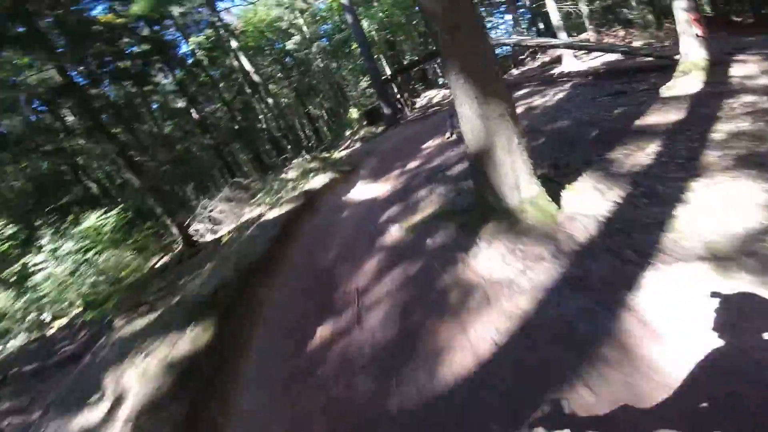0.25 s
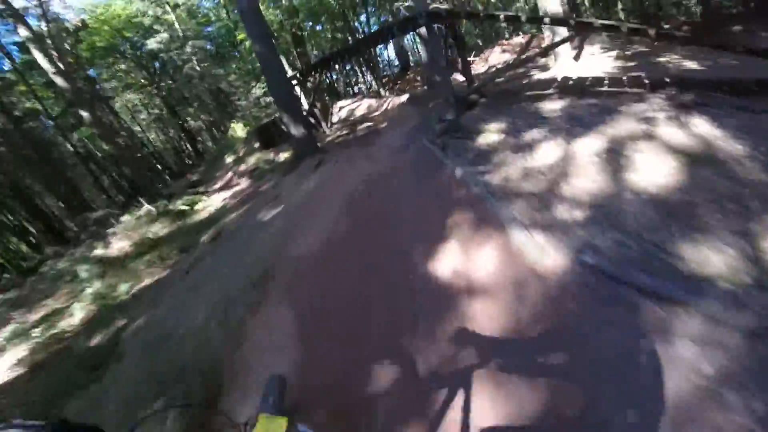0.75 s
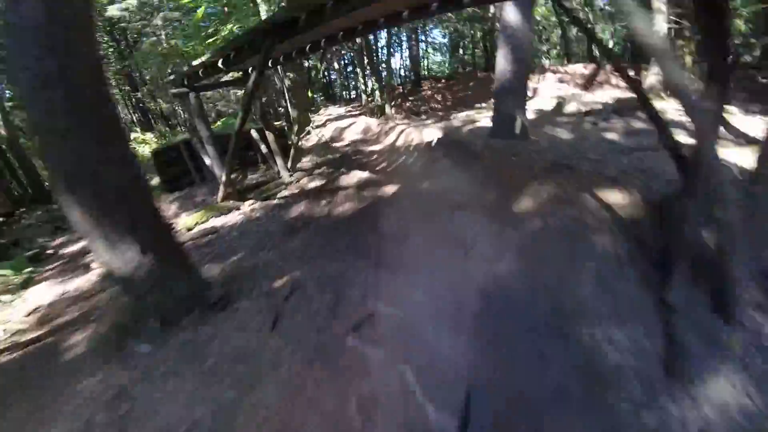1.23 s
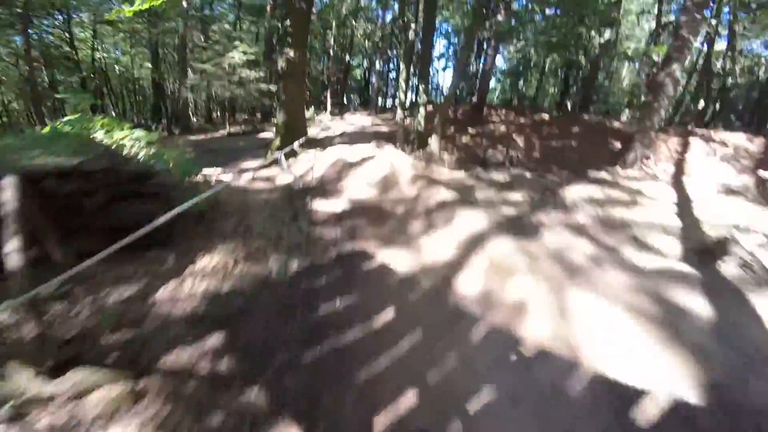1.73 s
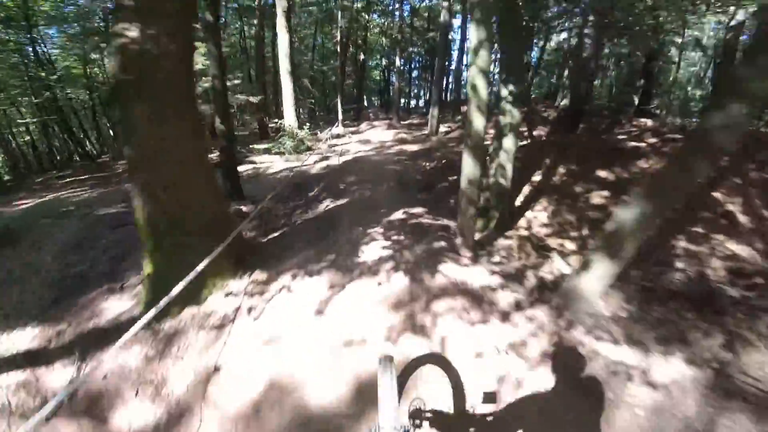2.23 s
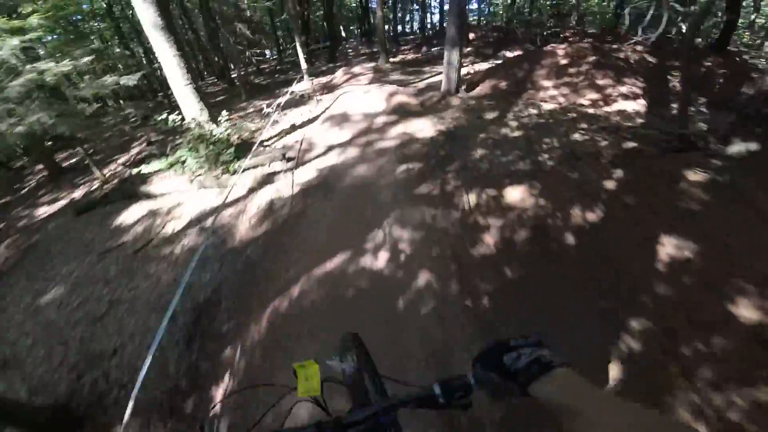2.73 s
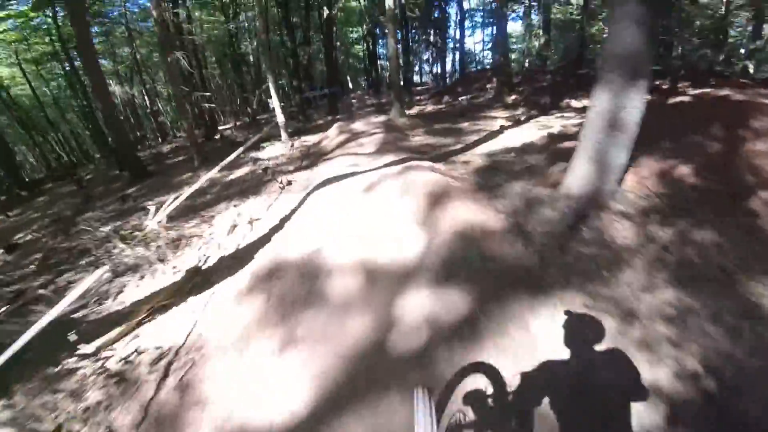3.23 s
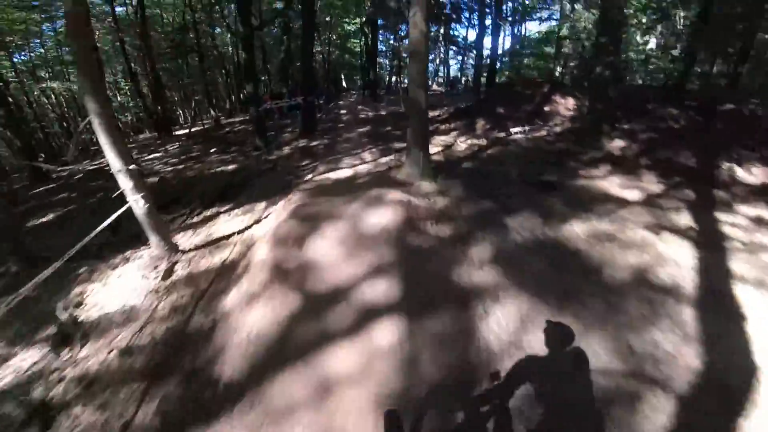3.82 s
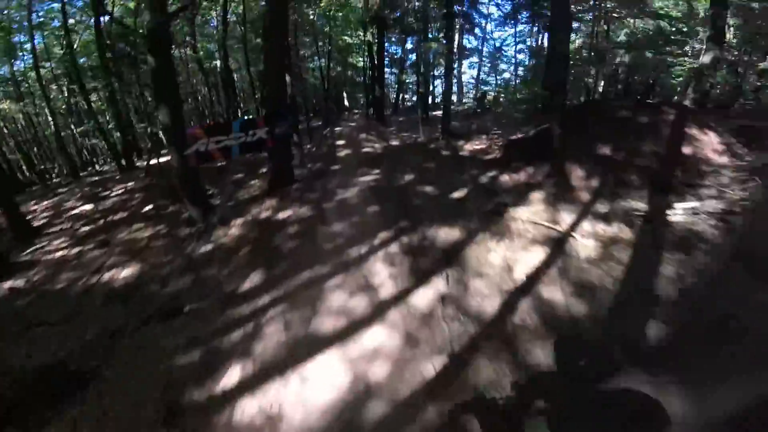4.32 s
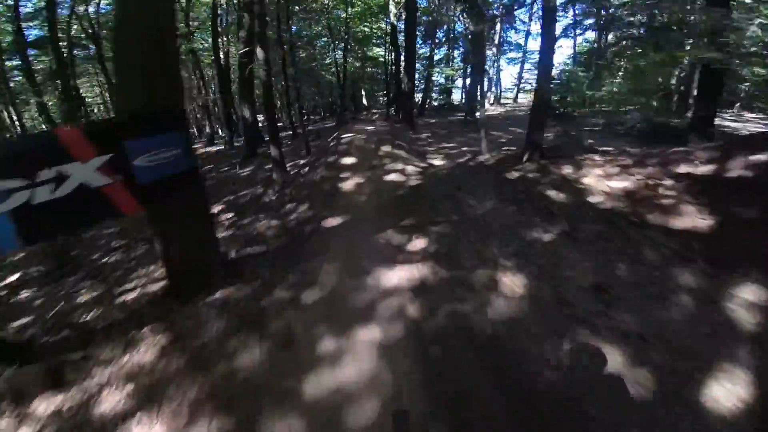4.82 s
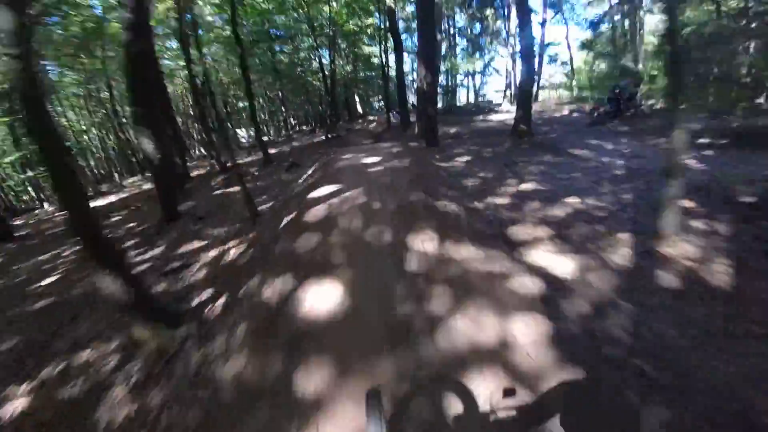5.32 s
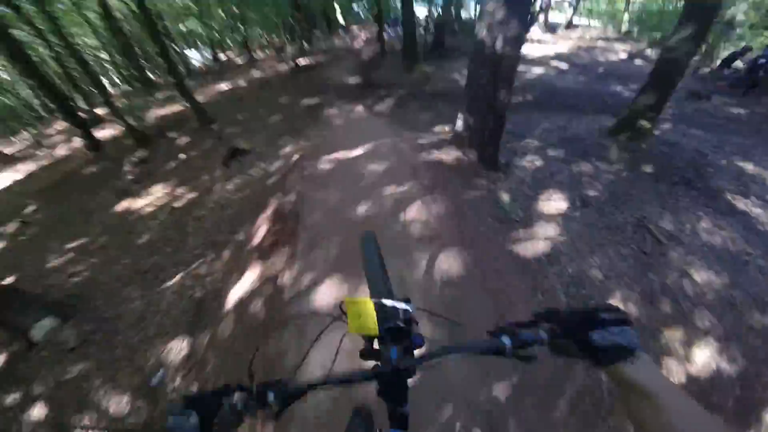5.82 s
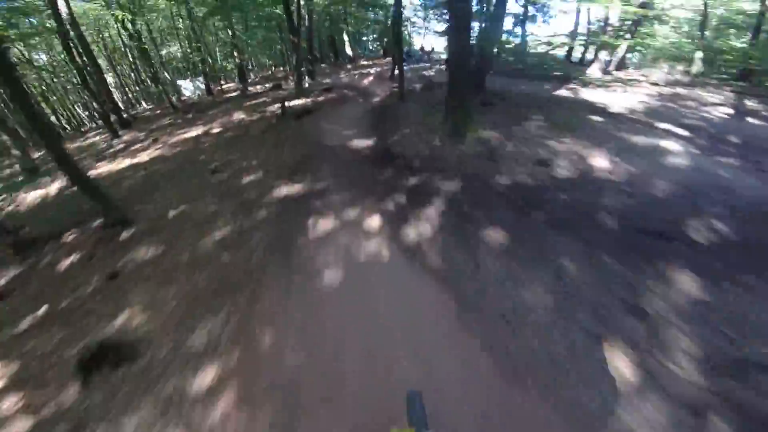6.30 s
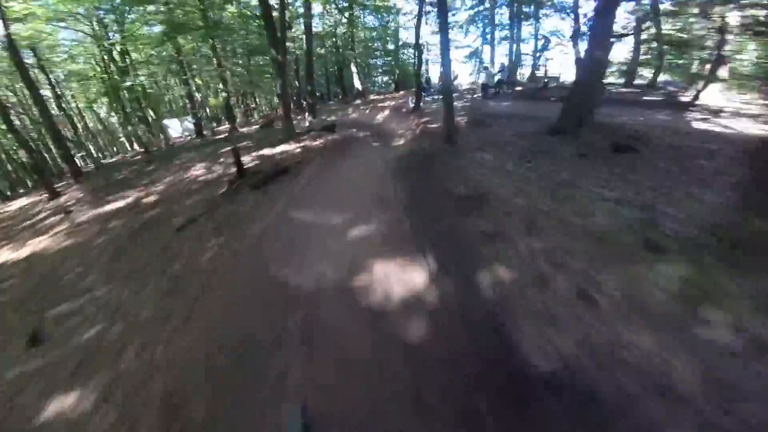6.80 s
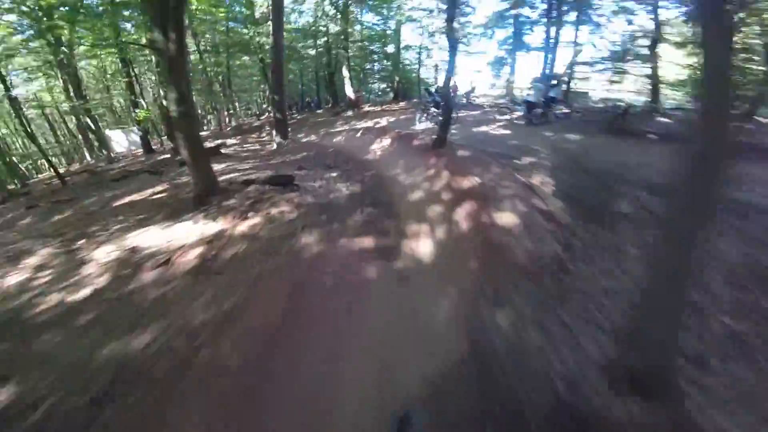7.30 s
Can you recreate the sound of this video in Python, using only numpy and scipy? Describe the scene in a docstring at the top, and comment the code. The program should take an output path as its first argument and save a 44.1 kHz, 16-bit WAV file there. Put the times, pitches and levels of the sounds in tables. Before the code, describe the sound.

A mountain bike rumbles and rattles over a dirt forest trail, with wind buffeting the microphone and a few heavy thumps.

```python
"""A mountain bike on a dry forest trail, heard close up from a camera worn by the rider.
From the start, wind buffets the microphone port and the tyres rumble and crunch over dirt. Near 1 s
the wheels hit roots, chain and cables rattle, and the camera turns its gain down for a moment.
Near 3 s the freehub's buzz swells as the rider coasts, just before another heavy landing.
A gust hoots at 5.5 s, two more heavy thumps follow, and the bike rolls on into the wind."""
import sys
import numpy as np
from scipy import signal
from scipy.fft import rfft, irfft, next_fast_len
from scipy.io import wavfile
from scipy.ndimage import uniform_filter1d, minimum_filter1d, map_coordinates

SR = 44100
rng = np.random.default_rng(int(sys.argv[2]) if len(sys.argv) > 2 else 0)


def waveform_to_disk(signal):
    """Save audio, clipped to [-1, 1], as 16-bit WAV at the path in sys.argv[1]."""
    frames = np.transpose(np.atleast_2d(signal))
    scaled = np.clip(frames, -1, 1) * 32767
    samples = np.round(scaled).astype(np.int16)
    wavfile.write(sys.argv[1], SR, samples)


N = 332955

# The rotor brushes its pads. Each row: peak in seconds, level in dB, half-width in seconds.
ROTOR_BRUSHES = [(.708, -49, 0.024), (1.42, -54.5, 0.043), (4.25, -54, 0.058), (5.708, -51, 0.025)]
# The freehub follows the wheel's speed. Each row: time in seconds, ticks per second.
PAWL_RATES = [(3.0, 89), (5.1, 101), (6.25, 78)]
# The wheel spins freely. Each row: peak in seconds, freehub level in dB, half-width in seconds.
FREE_SPINS = [(2.8, -63, 0.31), (6.03, -76, 0.34)]
# A link or spoke rings. Each row: start in seconds, level in dB, pitch in Hz.
METAL_PINGS = [(1.516, -43, 6220), (5.734, -39, 4940), (5.774, -47, 8250)]
# Bumps shake chain and cables. Each row: start in seconds, level in dB.
CHAIN_RATTLES = [(0.2746, -41.5), (0.4115, -42.5), (0.8945, -31.5), (1.055, -42), (1.4041, -47),
                 (1.5425, -38.5), (1.563, -49.5), (1.643, -39), (1.688, -47), (2.4807, -49), (3.084, -33.5),
                 (3.1258, -38), (4.067, -46.5), (4.2266, -42), (4.3615, -38), (5.409, -43), (5.4247, -44),
                 (5.456, -47), (5.5857, -40), (5.7335, -41.5), (5.7708, -43.5), (5.8335, -42.5),
                 (6.8606, -47)]
# Stones under the tyres. Each row: start in seconds, level in dB.
STONE_KNOCKS = [(1.492, -35), (1.842, -30), (3.759, -29.5), (4.375, -36.5), (6.969, -36)]
# Gravel gives way. Each row: peak in seconds, level in dB, fall in seconds.
GRAVEL_CRUNCHES = [(1.577, -42.5, 0.028), (1.64, -41.5, 0.03), (2.27, -42, 0.046), (3.231, -41, 0.018),
                   (3.542, -46.5, 0.04), (4.016, -46, 0.02), (4.05, -50, 0.02), (4.14, -45.5, 0.031),
                   (5.597, -38, 0.013), (6.653, -45, 0.052)]
# The wheels strike roots and hollows.
# Each row: start in seconds, strength in dB, pitch in Hz, seconds to decay by 60 dB.
WHEEL_BLOWS = [(0.931, 6, 36.6, 0.11), (1.385, -33.5, 279, 0.27), (1.562, 3, 72, 0.018),
               (2.503, -19.5, 111, 0.031), (3.076, 9, 29.6, 0.16), (3.755, -21, 137, 0.095),
               (5.685, 11.5, 57, 0.017), (6.197, -21.5, 213, 0.053), (6.41, 7, 24.9, 0.095)]

# Swells of ground and air. Each row: peak in seconds, level in dB, half-width in seconds.
DIRT_SPRAYS = [(.25, -57, 0.6), (.74, -55.5, 0.16), (1.6, -53, 0.15), (2.45, -56, 0.14), (5.45, -65, 0.64)]  # the tyres run through loose dirt
RUMBLE_SURGES = [(.06, -31.5, 0.99), (.91, -30, 0.026), (2.53, -26.5, 0.05), (2.605, -27.5, 0.025),
                 (2.69, -36, 0.022), (2.885, -33.5, 0.068), (4.27, -38, 0.11), (5.232, -25, 0.11),
                 (5.96, -36.5, 0.07)]  # the low rumble grows
PORT_SHOVES = [(.1, -27, 0.29), (.68, -16.5, 0.024), (.81, -17.5, 0.048), (1.44, -23, 0.028),
               (1.6, -16, 0.075), (1.8, -20.5, 0.046), (2.37, -31, 0.077), (3.92, -24, 0.04),
               (4.02, -23, 0.036), (4.71, -24.5, 0.05), (5.12, -33, 0.2), (5.48, -22.5, 0.066),
               (5.65, -23.5, 0.18), (6.79, -25, 0.047), (7.02, -30, 0.03), (7.2, -17.5, 0.03)]  # big, slow eddies push at the microphone
# Brief drops in level. Each row: centre in seconds, depth in dB, half-width in seconds.
CREST_LIFTS = [(3.86, 2, 0.035), (5.93, 3, 0.1)]  # the bike goes light over a crest and the hiss falls away
RUMBLE_HUSHES = [(2.41, 27, 0.075), (2.65, 14, .025), (3.85, 6, 0.41), (5.858, 10, 0.054), (6.61, 7, 0.071)]  # the rumble drops away
BUFFET_CALMS = [(1.24, 8, 0.18), (2.645, 9, 0.015), (2.79, 6, 0.07), (4.48, 5, 0.093), (4.89, 5, 0.05),
                (6.05, 7.5, 0.25), (6.61, 2.5, 0.033), (7.35, 6.5, 0.086)]  # the buffeting dies down

# Strong gusts make an edge hoot. Each row: peak in seconds, level in dB, half-width in seconds,
# pitch in Hz, glide in Hz per second, pitch unrest in Hz.
EDGE_TONES = [(0.64, -42.5, 0.14, 600, 302, 118), (2.314, -43, .036, 538, -3200, 54),
              (2.432, -46, 0.056, 463, -0.5, 25), (5.526, -47, 0.12, 470.4, 1.5, 40.4)]
# Eddies tear across the port. Each row: peak in seconds, level in dB, fall in seconds.
PORT_EDDIES = [(0.648, -31, 0.013), (0.727, -32.5, 0.021), (0.838, -42, 0.012), (1.372, -43, 0.022),
               (1.489, -41.5, 0.023), (2.996, -50, 0.021), (3.031, -33, 0.015), (3.94, -44, 0.011),
               (6.319, -44, 0.038)]
# Suction at the port snaps back. Each row: time in seconds, step in dB before filtering.
SUCTION_POPS = [(3.041, -8), (5.601, -19), (6.339, -23.5), (6.369, -15)]
# Air rushes past the camera. Each row: peak in seconds, level in dB, rise and fall in seconds.
AIR_GUSTS = [(0.04, -40.5, 0.4, 0.084), (0.629, -42, 0.63, 0.18), (1.0, -48.5, 0.27, 0.2),
             (1.67, -44.5, 0.47, 0.3), (2.36, -43, 0.42, 0.16), (3.26, -44.5, 0.3, 0.53),
             (4.14, -44.5, 0.22, 0.18), (4.81, -41, 0.35, 0.28), (5.57, -39.5, 0.54, 0.15),
             (6.015, -55, .009, 0.22), (6.68, -46, 0.29, 0.91), (7.11, -51, 0.083, 0.15),
             (7.54, -46, 0.084, 0.033)]

# Each source's tone at the microphone. Each row: frequency in Hz, relative level in dB.
PAWL_SPECTRUM = [(800, -20), (2200, -10), (2780, 10.5), (4200, -10), (5200, 5), (9400, -3), (10300, -10)]
STONE_SPECTRUM = [(100, -3), (300, 12), (600, 4.5), (900, -18), (1500, -23)]
GRIT_SPECTRUM = [(500, -3.5), (3000, 0.5), (4200, -4.5), (5000, 2.5), (9300, -6.5), (10900, -25.5),
                 (13500, -24)]
RUMBLE_SPECTRUM = [(35, -14.5), (70, 2), (115, 3.5), (160, -4), (450, -31.5)]
RUSH_SPECTRUM = [(90, -18.5), (260, 7.5), (440, 3), (640, 1.5), (720, -3.5), (880, -0.5), (1500, -5.5),
                 (2100, -8.5), (2900, -17.5), (4500, -26.5)]
BUFFET_SPECTRUM = [(8, -19), (18, 2), (28, 2), (45, -11.5), (130, -35.5)]
# The camera case colours the sound. Each row: centre in Hz, width in Hz, boost or cut in dB.
CASE_RESONANCES = [(459, 31, 3.5), (5320, 1150, 5), (6080, 385, -6.5), (6516, 670, 8.5), (6350, 160, 3)]

FREEHUB_DB, GRIT_DB, ROLL_DB, LULL_DB, BUFFET_DB = -67, -62, -38.5, -58, -26.5  # between swells
JOSTLE_DB, JOSTLES_PER_S = -61, 3.7  # faint, random rattles
REBOUND_S, REBOUND_LOSS_DB = 0.008, 7.5  # mean gap between a rattle's contacts, loss at each
CEILING_DB, REACT_S, RECOVER_DB_PER_S = -8.5, 0.0064, 11  # the camera's gain control
BAND_LIMIT_HZ = 13900


def amp(db):
    """Decibels to gain."""
    return 10 ** (np.asarray(db) / 20)


def unit(x):
    """Scale to rms 1."""
    return x / np.sqrt(np.mean(x ** 2) + 1e-20)


def add(track, s, sound):
    """Mix a sound in at s seconds."""
    part = track[max(round(s * SR), 0):][:len(sound)]
    part += sound[:len(part)]


def wobble(rate):
    """A smooth random curve, rate knots a second."""
    knots = rng.standard_normal(int(N * rate / SR) + 4)
    return map_coordinates(knots, [np.arange(N) * rate / SR])


def swell(s, db, rise, fall):
    """A smooth bump peaking at s, 17 dB down at rise seconds before and fall seconds after."""
    t = np.arange(N) / SR - s
    return amp(db) * np.exp(-2 * (t / np.where(t < 0, rise, fall)) ** 2)


def swells(rows):
    """An envelope of even-sided bumps."""
    return sum(swell(s, db, width, width) for s, db, width in rows)


def dips(rows):
    """A gain of 1 with smooth hollows."""
    return amp(-sum(depth_db * swell(s, 0, width, width) for s, depth_db, width in rows))


def bursts(rows, t60, attack):
    """An envelope that jumps at each row's start and dies away."""
    envelope, t = np.zeros(N), np.arange(SR // 4) / SR
    for s, db in rows:
        add(envelope, s, amp(db - 60 * t / t60) * (1 - np.exp(-t / attack)))
    return envelope


def shaped(x, gain_db):
    """Causal filter whose gain in dB is a function of frequency."""
    size = 2 * next_fast_len(N // 2 + SR // 4)
    cepstrum = irfft(np.log(amp(gain_db(np.fft.rfftfreq(size, 1 / SR)))))
    cepstrum[1:size // 2] *= 2  # fold to minimum phase
    cepstrum[size // 2 + 1:] = 0
    return irfft(rfft(x, size) * np.exp(rfft(cepstrum)))[:N]


def colour(x, points):
    """Filter x through (Hz, dB) points, falling steeply past the last one."""
    freqs, db = np.transpose(points)

    def gain_db(hz):
        rolloff_db = 70 * np.log10(np.maximum(hz / freqs[-1], 1))
        return np.interp(np.log(hz + 1), np.log(freqs), db) - rolloff_db
    return shaped(x, gain_db)


def noise(points):
    """Coloured noise of rms 1."""
    return unit(colour(rng.standard_normal(N), points))


def grains(rate, spread_db):
    """Random impulses of uneven size, about rate a second, rms 1."""
    impulses = (rng.random(N) < rate / SR) * rng.standard_normal(N)
    return unit(impulses * amp(spread_db * rng.standard_normal(N)))


def steady(x, span):
    """Even out the swells of x that are slower than span seconds."""
    size = max(int(span * SR), 2)
    power = np.abs(signal.hilbert(x)) ** 2
    slow_power = uniform_filter1d(uniform_filter1d(power, size), size)
    return unit(x / np.sqrt(np.abs(slow_power) + 1e-9))


def patchy(x, depth_db):
    """Let neighbouring pitches swell and fade in short, random patches."""
    spectra = signal.stft(x, nperseg=256)[2]
    patches = rng.standard_normal(spectra.shape)
    for _ in range(2):
        patches = uniform_filter1d(uniform_filter1d(patches, size=4, axis=0), size=7, axis=1)
    return unit(signal.istft(spectra * amp(depth_db * unit(patches)))[1][:N])


def cusped(x, sharpness):
    """Flatten the crests of x and sharpen its troughs, like the suction in an eddy's core."""
    analytic = signal.hilbert(x)
    return unit(np.real(analytic / (1 + sharpness * np.exp(1j * np.angle(analytic)))))


def freehub():
    """Faint, from the rear wheel: pawls drop over ratchet teeth, faster as it spins faster."""
    rate = np.interp(np.arange(N) / SR, *np.transpose(PAWL_RATES))
    teeth_passed = np.floor(np.cumsum(rate) / SR)
    clicks = np.diff(teeth_passed, prepend=0) * amp(1.9 * rng.standard_normal(N))
    decays = signal.lfilter([1], [1, -np.exp(-1 / (0.0065 * SR))], clicks)
    buzz = unit(colour(decays * rng.standard_normal(N), PAWL_SPECTRUM))
    return (amp(FREEHUB_DB) + swells(FREE_SPINS)) * buzz


def brakes():
    """Down at the hub, the steel rotor scrapes thinly on its pads."""
    return swells(ROTOR_BRUSHES) * noise([(3000, -18.5), (5100, 1.0), (7000, -14.0)])


def pings():
    """Now and then a single link or spoke rings at its own, slightly unsteady pitch."""
    track, t = np.zeros(N), np.arange(SR // 10) / SR
    for s, db, hz in METAL_PINGS:
        phase_drift = 0.054 * np.cumsum(rng.standard_normal(len(t)))
        add(track, s, amp(db - 60 * t / 0.023) * np.sin(2 * np.pi * hz * t + phase_drift))
    return track


def rattles():
    """Below the rider, chain and cables strike with a dry tick and three uneven rebounds."""
    contacts = rng.standard_normal(N) + 0.5 * grains(rate=1500, spread_db=2)
    metal = [(400, 12.5), (2000, 7.5), (3800, 8.0), (6500, 10.5), (8500, 4.5),
             (10500, -7.5), (13500, -46)]
    jostles = [(i / SR, JOSTLE_DB) for i in np.flatnonzero(rng.random(N) < JOSTLES_PER_S / SR)]
    ticks = []
    for s, db in list(CHAIN_RATTLES) + jostles:
        lags = np.cumsum(REBOUND_S * (0.5 + rng.random(3)))
        ticks += [(s + lag, db - REBOUND_LOSS_DB * k) for k, lag in enumerate([0, *lags])]
    return bursts(ticks, t60=0.034, attack=0.0006) * patchy(colour(contacts, metal), depth_db=2.5)


def crunches():
    """Loose gravel gives way under a tyre: a sudden cluster of dull little cracks."""
    cracks = colour(grains(rate=1400, spread_db=3.0), [(300, 2.0), (1700, 3.0), (3000, -7)])
    envelope = sum(swell(s, db, rise=0.011, fall=fall) for s, db, fall in GRAVEL_CRUNCHES)
    return envelope * steady(cracks, span=0.012)


def knocks():
    """Rubber softens each stone to a short, hollow knock."""
    return bursts(STONE_KNOCKS, t60=0.037, attack=0.0015) * steady(noise(STONE_SPECTRUM), span=0.0032)


def hoots():
    """Air over an edge near the microphone makes rough, hollow tones that swell, slide and fade."""
    track, t = np.zeros(N), np.arange(N) / SR
    for s, db, width, hz, glide, unrest in EDGE_TONES:
        pitch = hz + glide * (t - s) + unrest * wobble(230)
        tone = np.sin(2 * np.pi * np.cumsum(pitch) / SR)
        track += swell(s, db, width, width) * unit(tone * amp(2.7 * wobble(90)))
    return track


def eddies():
    """Turbulence right at the port: abrupt rasps, and pops as suction builds and snaps back."""
    envelope = sum(swell(s, db, rise=0.0012, fall=fall) for s, db, fall in PORT_EDDIES)
    rasps = envelope * noise([(150, 11.5), (1300, 16.5), (2600, 10), (4200, -13.0)])
    suction, t = np.zeros(N), np.arange(SR // 10) / SR
    for s, db in SUCTION_POPS:
        add(suction, s - t[-1], -amp(db) * np.exp((t - t[-1]) / 0.0022))
    return rasps + colour(suction, [(3000, -4.5), (9000, -7.5), (13000, -31)])


def rumble_and_grit():
    """A low rumble of tyres and wind swells and fades under the hiss of loose grit."""
    base = amp(ROLL_DB) * dips(RUMBLE_HUSHES)
    surging = swells(RUMBLE_SURGES)
    rumble = unit(steady(noise(RUMBLE_SPECTRUM), span=0.029) * amp(4.1 * wobble(35)))
    # the low mids grow faster than the bass, so a louder rumble also sounds harder
    low_mids = amp(-6.5) * (base + surging) ** 1.362 * noise([(120, -19.5), (260, 8.5), (500, -11)])
    crunch = rng.standard_normal(N) + 0.44 * grains(rate=560, spread_db=2.5)
    grit = patchy(colour(crunch, GRIT_SPECTRUM), depth_db=1)
    grit = unit(grit * amp(2.5 * wobble(75) + 1.4 * wobble(24)))
    grit_level = amp(GRIT_DB) * dips(CREST_LIFTS) + swells(DIRT_SPRAYS)
    surges = surging * steady(noise(RUMBLE_SPECTRUM), span=0.023)
    return base * rumble + surges + low_mids + grit_level * grit


def thumps():
    """Each root or hollow sets tyre and suspension swinging under the rider."""
    track, t = np.zeros(N), np.arange(SR // 3) / SR
    for s, db, hz, t60 in WHEEL_BLOWS:
        onset = 1 - np.exp(-t * hz * 2)
        add(track, s, amp(db - 60 * t / t60) * np.sin(2 * np.pi * hz * t) * onset)
    return track


def wind():
    """Slow pressure swings buffet the port; gusts of crackling air rush past and flutter with them."""
    swing = cusped(steady(noise(BUFFET_SPECTRUM), span=0.09), sharpness=0.22) * amp(1.1 * wobble(6))
    flutter_db = np.tanh(swing) + 1.3 * wobble(190) + 0.6 * wobble(35)
    crackle = rng.standard_normal(N) + 0.3 * grains(rate=110, spread_db=0)
    rush = unit(patchy(colour(crackle, RUSH_SPECTRUM), depth_db=2) * amp(flutter_db))
    rush_level = amp(LULL_DB) * dips(CREST_LIFTS) + sum(swell(*gust) for gust in AIR_GUSTS)
    buffet_level = (amp(BUFFET_DB) + swells(PORT_SHOVES)) * dips(BUFFET_CALMS)
    return buffet_level * swing + rush_level * rush


def scene():
    """Air, ground and bike, all close to one microphone that travels with the rider."""
    air = wind() + eddies() + hoots()
    ride = rumble_and_grit() + crunches() + thumps() + knocks()
    bike = rattles() + pings() + freehub() + brakes()
    return (air + ride + bike)[None]


def case_gain_db(freqs):
    """The case around the microphone resonates, lifting or cutting a few bands."""
    return sum(db / (1 + (2 * (freqs - hz) / width) ** 2) for hz, width, db in CASE_RESONANCES)


def gain_control(x):
    """A peak over the ceiling turns the camera's gain down at once; it creeps back up."""
    recovered_db = RECOVER_DB_PER_S * np.arange(N) / SR
    over_db = 20 * np.log10(np.maximum(np.abs(x) / amp(CEILING_DB), 1))
    gain_db = recovered_db - np.maximum.accumulate(over_db + recovered_db)
    size = int(REACT_S * SR)
    return x * amp(uniform_filter1d(minimum_filter1d(gain_db, size), size))


def record(dry):
    """The worn camera, in mono: its case rings, heavy thumps duck the level, the top treble is cut."""
    heard = gain_control(shaped(dry[0], case_gain_db))
    passband = np.fft.rfftfreq(N, 1 / SR) < BAND_LIMIT_HZ
    return irfft(rfft(heard) * passband, N)[None]


dry = scene()
out = record(dry)
waveform_to_disk(out)
```